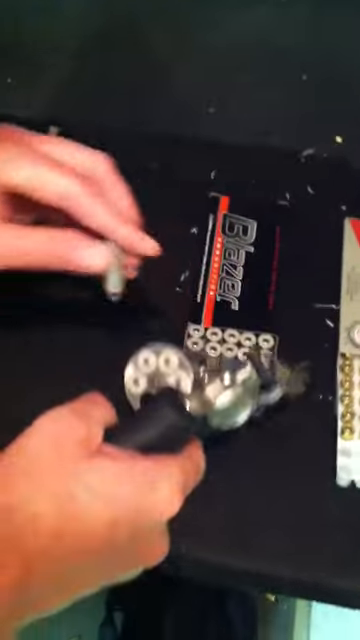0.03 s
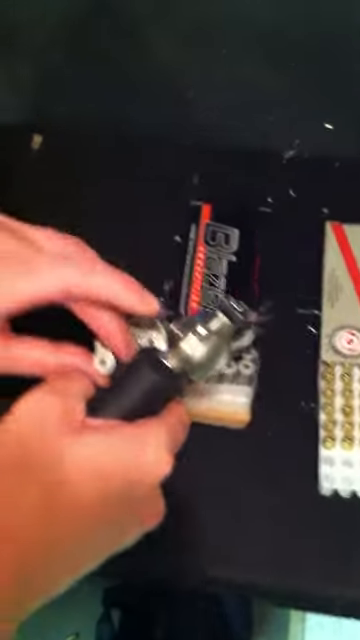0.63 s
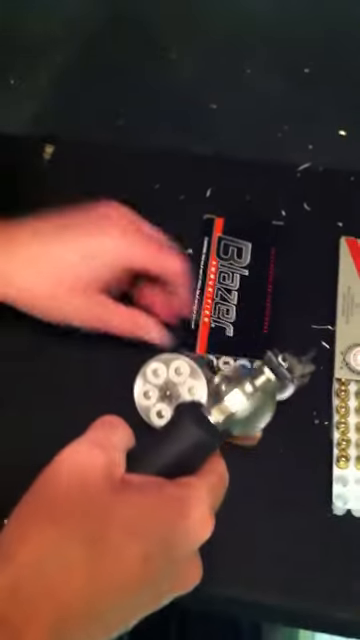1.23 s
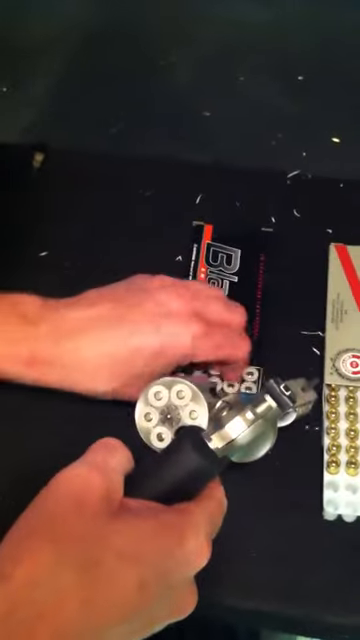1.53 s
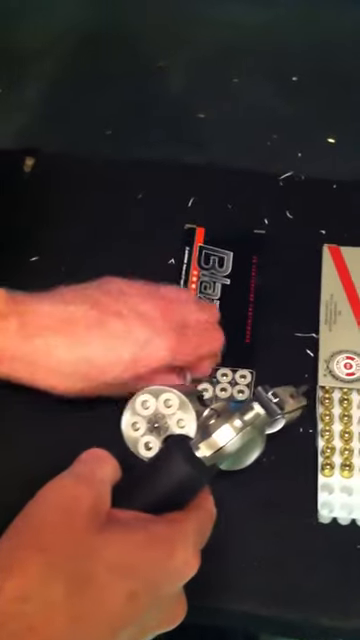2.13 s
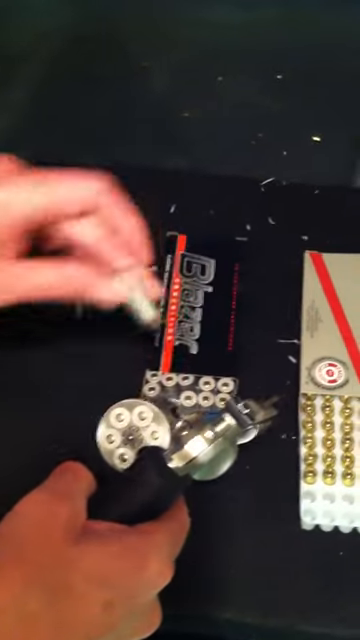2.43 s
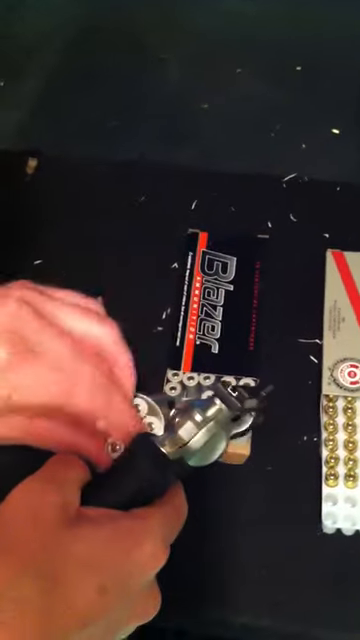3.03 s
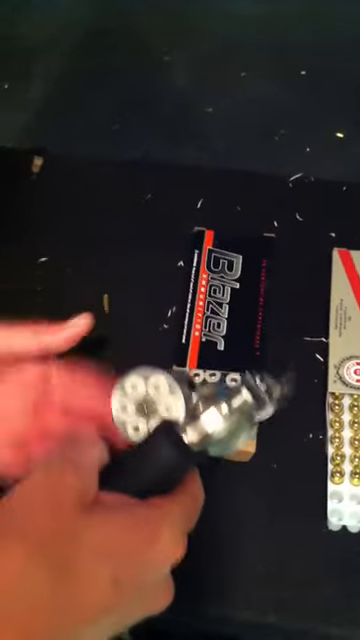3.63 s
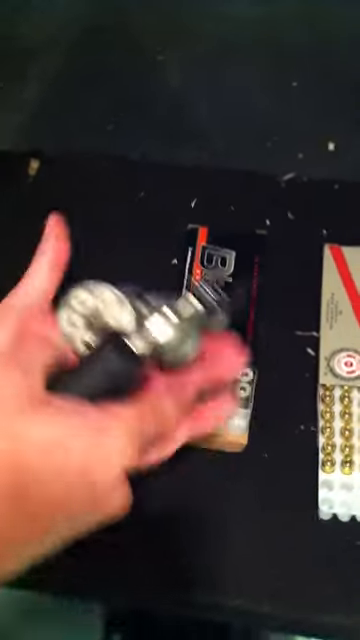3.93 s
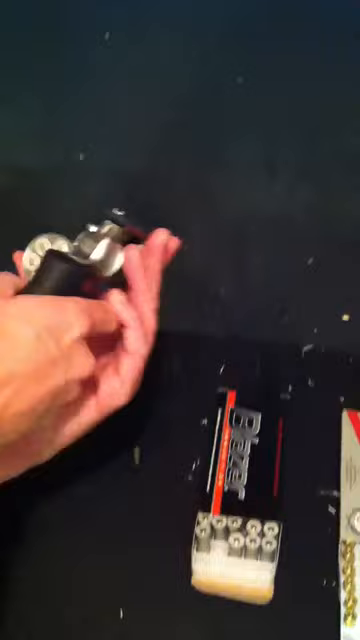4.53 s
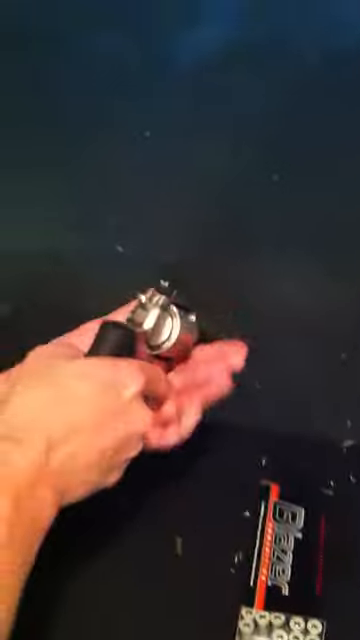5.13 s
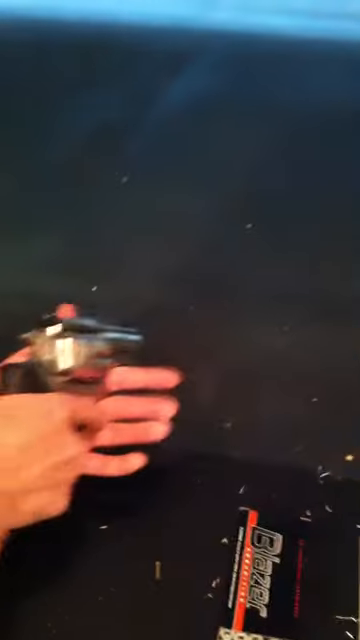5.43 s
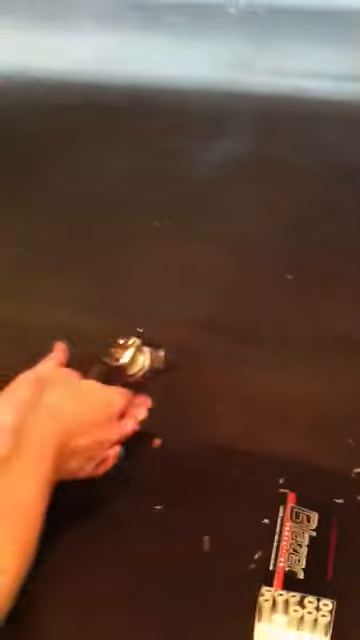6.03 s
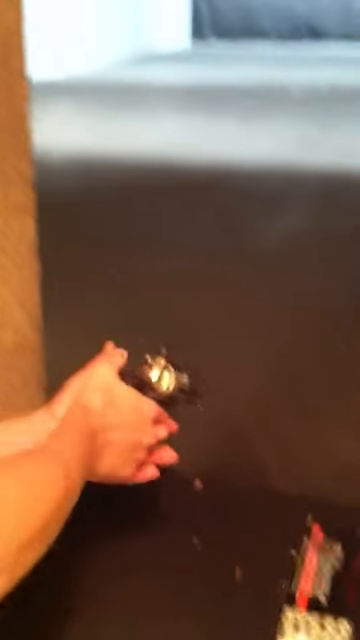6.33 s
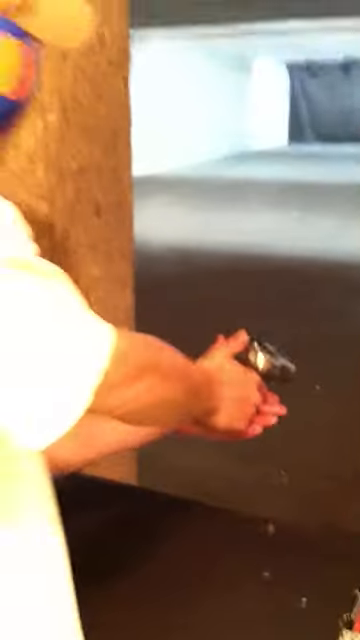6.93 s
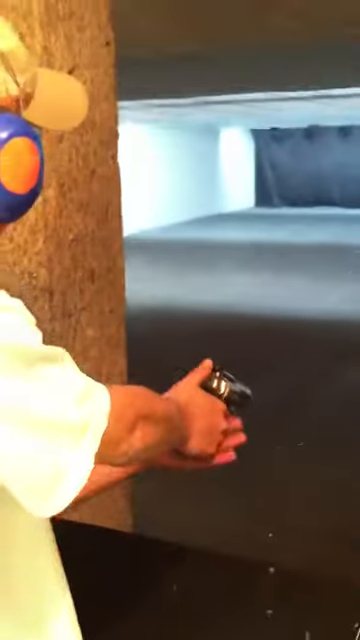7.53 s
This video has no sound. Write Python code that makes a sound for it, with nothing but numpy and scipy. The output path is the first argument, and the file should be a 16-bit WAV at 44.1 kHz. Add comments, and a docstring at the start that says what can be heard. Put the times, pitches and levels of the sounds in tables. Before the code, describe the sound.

Three loud gunshots echo in a concrete shooting range, with small brass clinks and a revolver's cylinder snapping closed nearby.

```python
"""Loading a revolver at an indoor range

Close to one microphone, brass cartridges clink in a tray and slide into a revolver, whose cylinder
snaps shut. Three shots from nearby lanes fill the concrete hall, which rings for seconds above the
drone of its ventilation. An automatic volume control turns each blast down, then creeps back up."""
import sys
import numpy as np
from scipy import signal
from scipy.fft import rfft, irfft, next_fast_len
from scipy.io import wavfile
from scipy.ndimage import uniform_filter1d

SR = 44100
rng = np.random.default_rng(int(sys.argv[2]) if len(sys.argv) > 2 else 0)


def digitize_waveform(pressure):
    """Quantize a signal to 16-bit integers and store it at the path in sys.argv[1].

    Rows of a 2-D input are taken as channels; values are limited to [-1, 1].
    """
    field = np.atleast_2d(pressure).T
    bounded = np.clip(field, -1, 1)
    quanta = np.round(bounded * 32767).astype(np.int16)
    wavfile.write(sys.argv[1], SR, quanta)


N = 342657
TIME = np.arange(N) / SR

# The three shots: (time [s], hall level [dB], crack level [dB], treble change [dB],
# midrange change [dB], lead-in level [dB], wall echo level [dB], build-up time [s])
SHOTS = [(1.148, -5, -5, 1.5, 1, -25.5, -35, 0.0079), (6.013, -6, -8.5, -2, 1, -26.5, -11, 0.00092),
         (6.743, -11, -12, 2.5, -3, -45.5, -19, 0.0093)]
# The tone of a blast as the hall carries it: (frequency [Hz], level [dB])
BLAST_SPECTRUM = [(25, -53), (70, -51), (125, -23.5), (220, -3), (380, -2.5), (560, -3), (800, -4.5),
                  (1100, -5), (1700, -13), (1980, -16), (4100, -16), (8000, -25), (11500, -32.5),
                  (13500, -54), (15500, -71.5)]


def amp(db):
    """Turn decibels into a number to multiply a sound by."""
    return 10 ** (np.asarray(db) / 20)


def unit(x):
    """Scale a sound so that its average strength (rms) is 1."""
    return x / np.sqrt(np.mean(x ** 2) + 1e-20)


def along(points, hz):
    """Read between the rows of a (frequency, value) table, with octaves evenly spaced."""
    frequencies, values = np.transpose(points)
    return np.interp(np.log(hz + 1), np.log(frequencies), values)


def filtered(x, response):
    """Multiply each frequency in a sound by response(frequency)."""
    size = next_fast_len(len(x) + 8192)
    return irfft(rfft(x, size) * response(np.fft.rfftfreq(size, 1 / SR)), size)[:len(x)]


def noise(spectrum, size, treble_db=0, treble_hz=2000):
    """Noise with the given tone, its treble then turned up or down by treble_db."""
    x = unit(filtered(rng.standard_normal(size), lambda hz: amp(along(spectrum, hz))))
    return filtered(x, lambda hz: amp(treble_db * hz ** 4 / (hz ** 4 + treble_hz ** 4)))


def fade(t, t60):
    """Die away by 60 dB in t60 seconds, the 'fade time'."""
    return np.exp(-np.log(1000) * t / t60)


def rise(t, rise_s):
    """Grow from 0 towards 1, about two thirds of the way in rise_s seconds."""
    return 1 - np.exp(-t / rise_s)


def add(track, start_s, x):
    """Mix a sound into the track at the given time."""
    part = track[max(round(start_s * SR), 0):][:len(x)]
    part += x[:len(part)]


def ring(tones, t):
    """Struck metal rings with several fading tones; each blow shares its energy out differently."""
    return sum(amp(db + rng.normal(0, 1.7)) * fade(t, t60) * np.sin(2 * np.pi * (hz * t + rng.random()))
               for hz, db, t60 in tones)


def ventilation(air_db=-41, fan_db=-46):
    """Air rushes steadily while fans and ducts hum with narrow, wavering tones."""
    # Rushing air: (frequency [Hz], level [dB])
    air_spectrum = [(15, -64.5), (25, -58), (91, -16.5), (122, -12.5), (156, -1.5), (253, -11.5), (289, -6),
                    (368, -13), (445, -15.5), (537, -19.5), (848, -15.5), (970, -22), (2230, -29.5),
                    (10400, -58), (15500, -74)]
    # Fan and duct tones: (frequency [Hz], width [Hz], level [dB])
    fan_tones = [(98.8, 7.6, -10.5), (166, 10.26, -1), (284, 5.2, -10), (297.4, 4, -5), (329, 26, -9),
                 (447, 2, -5.5), (834, 11, -12.5)]
    peaks = lambda hz: sum(amp(db) / np.sqrt(width) / (1 + (2 * (hz - centre) / width) ** 2)
                           for centre, width, db in fan_tones)
    hum = unit(filtered(rng.standard_normal(N), peaks))
    swell_db = np.interp(TIME, [3.9, 5.35], [0, 4])  # the hum grows once, slowly
    return amp(air_db) * noise(air_spectrum, N) + amp(fan_db + swell_db) * hum


def swishes(rise_s=0.026):
    """Soft swishes of hiss rise quickly and fade away."""
    # Soft swishes: (time [s], level [dB], fade time [s])
    soft_swishes = [(0.074, -53, 0.98), (.93, -52.5, 0.63), (1.98, -53, 0.62), (2.15, -50, 0.4),
                    (4.926, -52, 0.67), (5.34, -60, .6)]
    # Tone of the hiss: (frequency [Hz], level [dB])
    hiss_spectrum = [(1000, -11.5), (4000, 4), (6500, -2.5), (10500, -11.5), (13500, -28.5)]
    out, t = np.zeros(N), TIME[:SR]
    for start_s, db, t60 in soft_swishes:
        add(out, start_s, amp(db) * rise(t, rise_s) * fade(t, t60) * noise(hiss_spectrum, len(t)))
    return out


def booth(x, echo_db=-17, t60=0.21):
    """The bench and side walls bounce small sounds back, a little duller."""
    # The booth's echo: (frequency [Hz], level [dB])
    echo_spectrum = [(500, 2), (4000, -6), (9000, -7), (12000, -10), (15000, -19)]
    t = TIME[:SR // 2]
    echo = noise(echo_spectrum, len(t)) * fade(t, t60)
    return x + amp(echo_db) * signal.fftconvolve(x, echo / np.linalg.norm(echo))[:N]


def brass_contact(ring_db, knock_db, pitch_hz, knock_t60=0.012, ping_db=4, ping_t60=0.0066):
    """One tap of a brass case gives a high ring and a dry knock with a short ping."""
    # The ringing case: (frequency [Hz], level [dB], fade time [s])
    case_tones = [(12150, -8.5, 0.026), (12650, -14, 0.025), (11800, -15, 0.018), (6870, -29, 0.044)]
    # The dry knock: (frequency [Hz], level [dB])
    knock_spectrum = [(800, -6), (2500, -13), (4300, -1), (6000, -7), (9000, -14), (12000, -17),
                      (13500, -23), (15500, -32)]
    t = TIME[:SR // 5]
    knock = fade(t, knock_t60) * noise(knock_spectrum, len(t))
    ping = ring([(pitch_hz, ping_db, ping_t60)], t)
    return (amp(ring_db) * ring(case_tones, t) + amp(knock_db) * (knock + ping)) * rise(t, 0.00026)


def tray(ring_db=8, knock_db=-8, pitch_hz=7000, from_s=1.44, to_s=2.26, count=22, fall_db_per_s=16):
    """Fingers pick among loose cases: a few clear clinks over a faint jingle that dies down."""
    # Cases bumping together: (time [s], level [dB])
    clinks = [(1.513, -35), (1.6132, -49), (1.6242, -48), (1.7704, -53), (2.0677, -63), (2.2243, -50),
              (2.2318, -43.5), (2.3595, -63)]
    out = np.zeros(N)
    jingle_delays = (to_s - from_s) * (np.arange(count) + rng.random(count)) / count
    jingle_db = -55 - fall_db_per_s * jingle_delays + rng.normal(0, 2, count)
    for start_s, db in [*clinks, *zip(from_s + jingle_delays, jingle_db)]:
        add(out, start_s, brass_contact(db + ring_db, db + knock_db, pitch_hz))
    return out


def cartridges(ring_db=-12, knock_db=-8, rim_s=0.0013, rim_db=-1.5, rattle_s=0.02, rattle_db=(-22, -26)):
    """Each cartridge knocks into its chamber, lands on its rim and rattles twice."""
    # Cartridges pushed home: (time [s], level [dB], ping pitch [Hz])
    pushes = [(0.8814, -22.5, 4850), (3.341, -18, 5680), (3.4158, -26, 5630)]
    out = np.zeros(N)
    for start_s, db, pitch_hz in pushes:
        rattle_delays = np.cumsum(rattle_s * rng.uniform(0.5, 1.5, size=2))
        for delay, step_db in [(0, 0), (rim_s, rim_db), *zip(rattle_delays, rattle_db)]:
            tap = brass_contact(db + step_db + ring_db, db + step_db + knock_db, pitch_hz)
            add(out, start_s + delay, tap)
    return out


def cylinder(steel_db=-13.5, snap_t60=0.022, firm_db=-8, thinning=0.25):
    """The cylinder swings shut and clicks into place; the hand keeps the frame's ring short."""
    # Clicks of the cylinder and its latch: (time [s], level [dB])
    clicks = [(4.691, -38.5), (4.731, -51), (4.8423, -10), (4.8834, -36), (4.9158, -24), (5.458, -53),
              (7.7434, -49)]
    # The ringing steel frame: (frequency [Hz], level [dB], fade time [s])
    steel_tones = [(1950, 1, 0.022), (2433, -4, 0.03), (3790, -3, 0.028), (5000, 4, 0.023),
                   (6150, -4, 0.031), (6790, 1.5, 0.029), (7700, -6, 0.026), (10050, -8, .06),
                   (12330, -9, .035), (14300, -7, .016)]
    # A hard snap: (frequency [Hz], level [dB])
    snap_spectrum = [(300, -20), (1000, -3), (1900, 2.5), (5000, 3.5), (8000, 1), (10500, -3.5),
                     (13300, -11), (15500, -14)]
    out, t = np.zeros(N), TIME[:SR // 5]
    for start_s, db in clicks:
        cut_db = thinning * (firm_db - db)  # lighter clicks have less bass
        snap = amp(-cut_db) * noise(snap_spectrum, len(t), cut_db, treble_hz=4500) * fade(t, snap_t60)
        frame = amp(steel_db - cut_db / 2) * ring(steel_tones, t)
        add(out, start_s, amp(db) * (snap + frame) * rise(t, 0.00068))
    return out


def lead_ins(lead_s=0.065, dull_db=-3, swell_db=15, swell_s=0.023, boom_hz=800):
    """A quieter, duller rush opens each shot; its bass swells into the blast."""
    out, t = np.zeros(N), TIME[:round(lead_s * SR)]
    keep_bass = lambda hz: 1 / (1 + (hz / boom_hz) ** 4)
    for shot_s, *_, lead_db, _, _ in SHOTS:
        rush = noise(BLAST_SPECTRUM, SR, dull_db)[:len(t)] * rise(t, 0.0062)
        boom = unit(filtered(noise(BLAST_SPECTRUM, SR), keep_bass))[:len(t)]
        swell = amp(swell_db) * np.exp((t - lead_s) / swell_s)
        soft_end = rise(lead_s - t, 0.001)
        add(out, shot_s - lead_s, amp(lead_db) * soft_end * (rush + swell * boom))
    return out


def hall(x, swell_db=1.0, swell_s=0.21, roar_hz=1900):
    """The roar swells as it returns from the far end, while air and walls soak up the treble first."""
    # How long the concrete hall rings: (frequency [Hz], fade time [s])
    fade_times = [(100, 3.7), (200, 2.23), (450, 2.4), (1100, 2.54), (2600, 2.12), (4500, 1.58),
                  (7200, 1.06), (10500, 0.72), (14000, 0.31)]
    hz, t, bands = signal.stft(x, SR, nperseg=1024)  # split the sound into frequency bands
    roar = 1 / (1 + (hz[:, None] / roar_hz) ** 4)
    swell = (t / swell_s * np.exp(1 - t / swell_s)) ** 2
    decay = fade(t, along(fade_times, hz)[:, None])
    return signal.istft(bands * amp(swell_db * roar * swell) * decay, SR)[1][:len(x)]


def shots(crack_t60=0.16, echo_s=0.055, echo_t60=0.48, mid_hz=1500, mid_width_hz=600):
    """Each shot is a bright crack of first echoes, a slap off the far wall and the hall's long ring."""
    # The bright crack: (frequency [Hz], level [dB])
    crack_spectrum = [(30, -32), (150, -21), (500, -21), (1500, -1), (4500, 1), (7500, -4.5), (11000, -15),
                      (15500, -39)]
    out, t = np.zeros(N), TIME[:3 * SR]
    for start_s, hall_db, crack_db, treble_db, mid_db, _, echo_db, build_s in SHOTS:
        blast = noise(BLAST_SPECTRUM, len(t), treble_db, treble_hz=1830)
        midrange = lambda hz: amp(mid_db / (1 + (2 * (hz - mid_hz) / mid_width_hz) ** 2))
        tail = amp(hall_db) * hall(filtered(blast, midrange))
        crack = amp(crack_db) * fade(t, crack_t60) * noise(crack_spectrum, len(t))
        add(out, start_s, rise(t, build_s) * (crack + tail))
        wall_echo = amp(echo_db) * fade(t, echo_t60) * noise(BLAST_SPECTRUM, len(t))
        add(out, start_s + echo_s, wall_echo)
    return out


def scene():
    """Everything reaches one microphone and is heard the same in both ears."""
    mono = shots() + lead_ins() + booth(cartridges() + tray() + cylinder()) + swishes() + ventilation()
    return np.array([mono, mono])


def volume_control(x, threshold_db=-11.5, recover_db_per_s=13, react_s=0.00417):
    """Turn loud sound down quickly, then let the volume creep back up."""
    level_db = 10 * np.log10(np.abs(uniform_filter1d(x ** 2, size=900)) + 1e-12)
    excess_db = np.maximum(level_db - threshold_db, 0)
    creep_db = recover_db_per_s * TIME
    cut_db = np.maximum.accumulate(excess_db + creep_db) - creep_db  # each cut shrinks at a steady rate
    smoothing = np.exp(-1 / (react_s * SR))
    return x * amp(-signal.lfilter([1 - smoothing], [1, -smoothing], cut_db))


def record(dry, ceiling=0.7, top_hz=15500):
    """Control the volume, round off the peaks and remove the very highest treble."""
    x = volume_control(dry[0])
    x = x / (1 + np.abs(x / ceiling) ** 8) ** (1 / 8)
    x = filtered(x, lambda hz: np.exp(-(hz / top_hz) ** 50))
    return np.array([x, x])


dry = scene()
out = record(dry)
digitize_waveform(out)
```